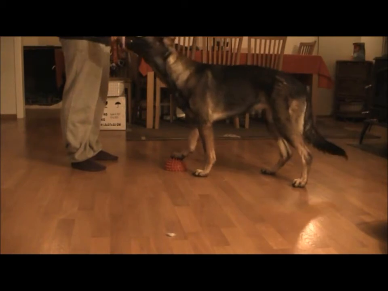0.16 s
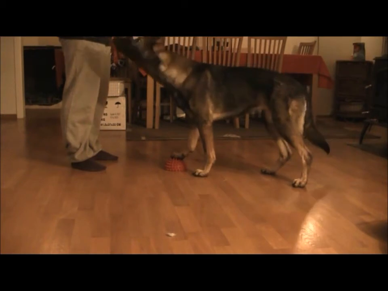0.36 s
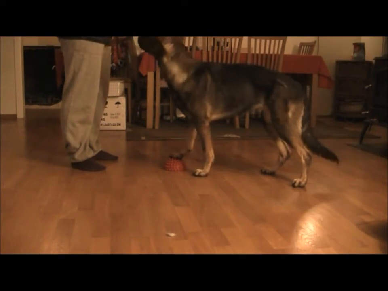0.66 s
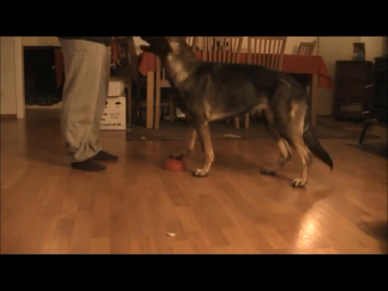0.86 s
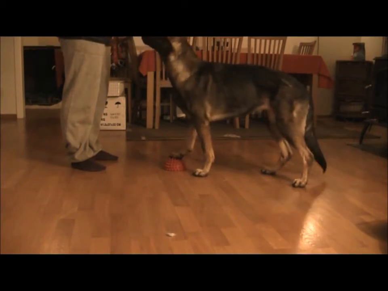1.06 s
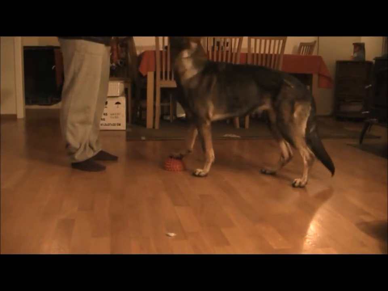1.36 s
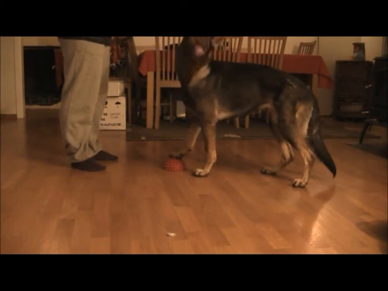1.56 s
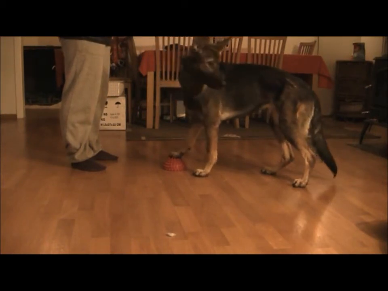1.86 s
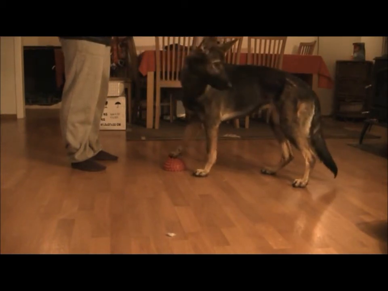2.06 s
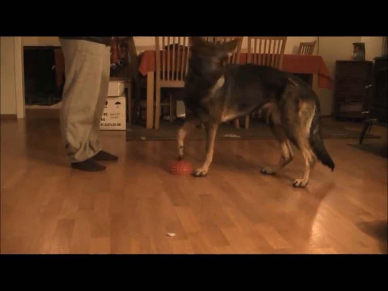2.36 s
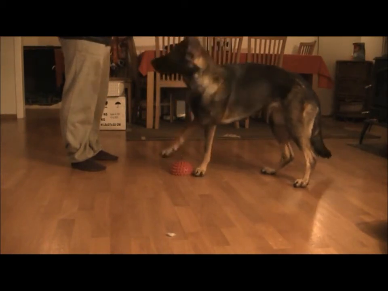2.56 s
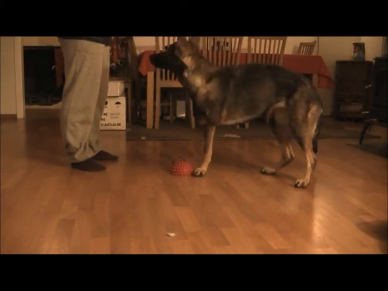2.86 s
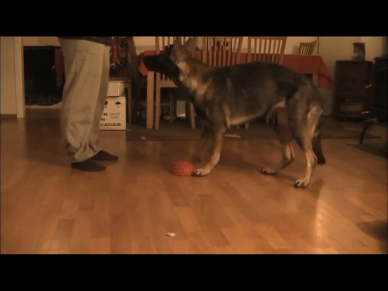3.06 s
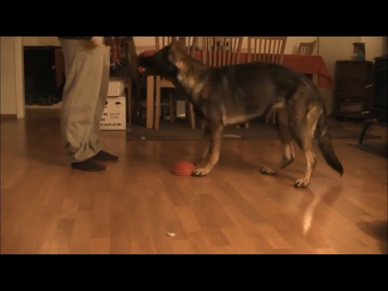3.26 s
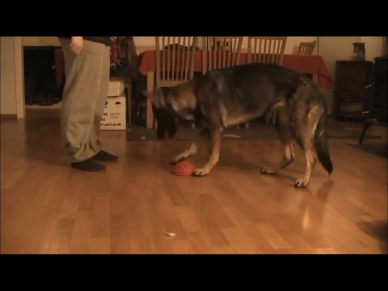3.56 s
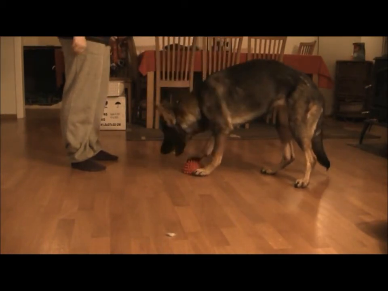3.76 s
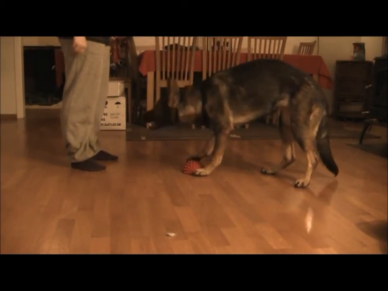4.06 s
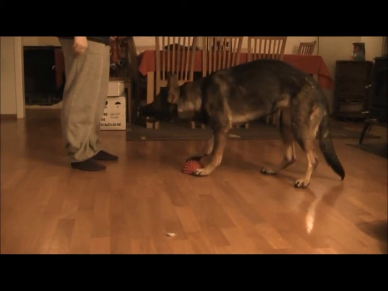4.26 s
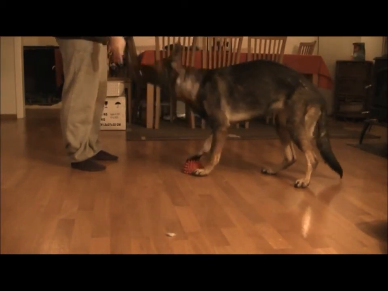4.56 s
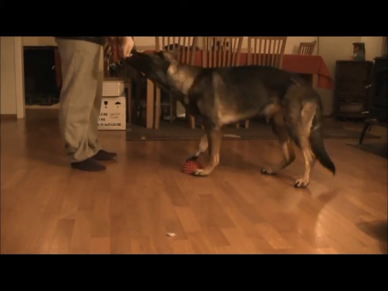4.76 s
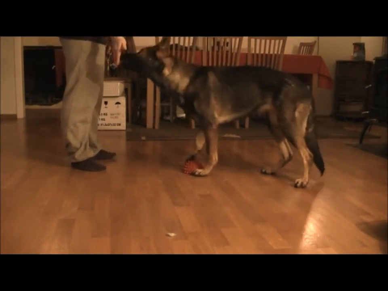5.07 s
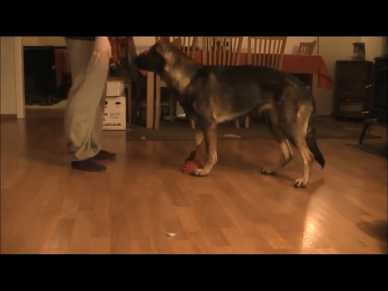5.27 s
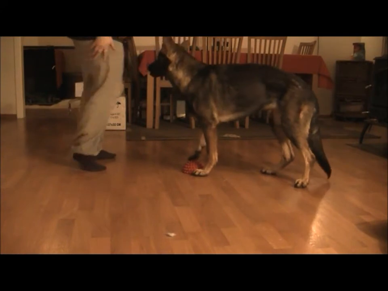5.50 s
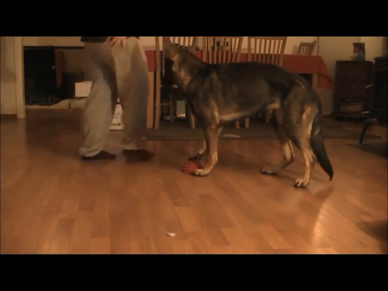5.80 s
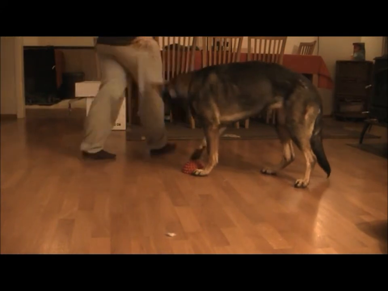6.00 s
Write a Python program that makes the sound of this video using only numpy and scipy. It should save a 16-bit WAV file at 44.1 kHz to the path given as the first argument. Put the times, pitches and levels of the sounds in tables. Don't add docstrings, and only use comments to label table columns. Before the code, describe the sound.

Faint stereo hiss, a slight hum and small focus-motor ticks underlie a dog stepping on wooden boards. Claws tap and ping, pads scuff, cloth and fur brush softly. After a run of small dry clicks and a low hollow wobble, one hard knock leaps far above everything, with a woody, rubbery ring and room tail. Quiet scuffs and crisp claw knocks continue to the end, a few metres from the microphone.

```python
import sys
import numpy as np
from scipy import signal
from scipy.fft import rfft, irfft
from scipy.io import wavfile

SR = 44100
rng = np.random.default_rng(int(sys.argv[2]) if len(sys.argv) > 2 else 0)


def store_wav(level_fs):
    pcm = np.round(np.clip(np.atleast_2d(level_fs), -1, 1) * 32767)
    wavfile.write(sys.argv[1], SR, pcm.T.astype(np.int16))


def level_to_linear(level):
    exponent = np.asarray(level, float) / 20
    return 10 ** exponent


N = 270628


def evened(x):
    return x / np.sqrt(np.mean(x ** 2) + 1e-20)


def peaked(x):
    return x / (abs(x).max() + 1e-20)


def read(points, hz):
    f, value = np.transpose(points)
    return np.interp(np.log(hz + 1), np.log(f + 1), value)


def colour(x, points):
    n = x.shape[-1]
    gain = level_to_linear(read(points, np.fft.rfftfreq(n, 1 / SR)))
    return irfft(rfft(x) * gain, n)


def causal(points):
    log_gain = np.log(level_to_linear(read(points, abs(np.fft.fftfreq(8192, 1 / SR)))))
    return np.fft.ifft(np.exp(log_gain - 1j * signal.hilbert(log_gain).imag)).real[:4096]


def add(mix, s, sound):
    part = mix[..., round(s * SR):][..., :sound.shape[-1]]
    part += sound[..., :part.shape[-1]]


def resonate(x, hz, width):
    turn = np.exp(2j * np.pi * np.cumsum(hz * np.ones(len(x))) / SR)
    r = np.exp(-np.pi * width / SR)
    return 2 * (turn * signal.lfilter([1 - r], [1, -r], x / turn)).real


def steep(x, hz, width):
    return resonate(resonate(x, hz, width), hz, width)


def modes(table, t):
    return peaked(sum(level_to_linear(db - 60 * t / t60) * np.sin(2 * np.pi * hz * t) for hz, db, t60 in table))


def touch(size, scratch, ms):
    contact = scratch * rng.standard_normal(size) * np.exp(-np.arange(size) / (ms * SR / 1000))
    contact[0] = 1
    contact_hz = 5000
    return signal.sosfilt(signal.butter(2, contact_hz, fs=SR, output="sos"), contact)


# f/Hz, t60/s
ROOM_T60 = [(100, 0.52), (300, 0.47), (700, 0.5), (1400, 0.51), (3000, 0.48), (5500, 0.38), (8000, 0.41),
            (14000, 0.09)]
# f/Hz, level/dB
ROOM_SIDE = [(60, -20), (180, -14), (550, -13.5), (1650, -7), (4970, -3.5), (15000, 9)]
# t/s, level/dB
ECHOES = [(.0015, 12.5), (.003, -15.5), (.008, 6), (0.0095, -2), (0.02, 2), (0.027, -20)]


def tail():
    hz, t, z = signal.stft(rng.standard_normal((2, SR)), SR, nperseg=256)
    z = z * level_to_linear(-60 * t / np.maximum(read(ROOM_T60, hz), .05)[:, None])
    z[1] *= level_to_linear(read(ROOM_SIDE, hz))[:, None]
    rise = np.minimum(np.arange(SR) / (0.0038 * SR), 1)
    mid, side = signal.istft(z, SR, nperseg=256)[1][:, :SR] * rise
    both = np.array([mid + side, mid - side]) / np.linalg.norm(mid)
    for s, db in ECHOES:
        both[:, round(s * SR) + rng.integers(-3, 4, size=2)] += 0.16 * level_to_linear(db) * rng.choice([-1, 1])
    return both


def in_room(x, wet_db):
    return x + level_to_linear(wet_db) * signal.fftconvolve(x[None], tail(), axes=1)[:, :len(x)]


# f/Hz, level/dB per Hz
HISS_MID = [(18, -44), (30, -13), (164, -8.5), (208, -7), (341, -11), (455, -8), (945, -12), (1230, -11),
            (1870, -13.5), (2490, -16.5), (15500, -37)]
# f/Hz, level/dB per Hz
HISS_SIDE = [(18, -45.5), (30, -46), (59, -8), (117, -7.5), (168, -6), (208, -6), (359, -7), (1170, -14),
             (1770, -17), (2020, -16.5), (15500, -41.5)]
# f/Hz, rms/dB
HUM = [(199.2, -87), (301.5, -80.5), (651.4, -84)]
# first t/s, steps
FOCUS = [(.419, 6), (.676, 3), (.899, 3), (1.036, 3), (1.219, 3), (1.396, 4), (1.579, 2), (1.676, 4),
         (1.939, 3), (2.476, 3), (2.659, 4), (2.836, 2), (3.196, 4), (3.379, 4), (3.556, 3), (4.676, 3),
         (4.899, 2), (4.996, 2), (5.179, 4), (5.356, 1), (5.539, 5), (5.756, 2), (5.899, 1)]
# f/Hz, width/Hz, peak/dB
LENS_BARREL = [(4500, 800, -59.5), (3300, 900, -63), (2200, 900, -64)]


def camera():
    mid = level_to_linear(-70.5) * evened(colour(rng.standard_normal(N), HISS_MID))
    side = level_to_linear(-64) * evened(colour(rng.standard_normal(N), HISS_SIDE))
    for hz, db in HUM:
        mid += level_to_linear(db) * evened(resonate(rng.standard_normal(N), hz, 3.5))
    steps = np.zeros(N)
    for s, count in FOCUS:
        steps[np.round((s + np.arange(count) / 25) * SR).astype(int)] = 1
    steps *= level_to_linear(2.5 * rng.standard_normal(N))
    for hz, width, db in LENS_BARREL:
        mid += level_to_linear(db) * peaked(steep(steps, hz, width))
    return np.array([mid + side, mid - side])


REST_DB, DRAG_REST_DB = -87, -77.5


def strokes(peak_s, length, db):
    rise_share = 0.49
    late = np.arange(0, N, 64)[:, None] / SR - peak_s
    reach = length * np.where(late < 0, rise_share, 1 - rise_share)
    power = (level_to_linear(db - 20 * (late / reach) ** 2) ** 2).sum(1) + level_to_linear(REST_DB) ** 2
    return np.interp(np.arange(N), np.arange(0, N, 64), np.sqrt(power))


# loudest t/s, length/s, level/dB, lower f/Hz, upper against lower/dB
SLIDES = [(0.017, 0.98, -74, 1010, 4.5), (0.222, 0.09, -66, 646, -4), (0.425, 0.57, -72.5, 860, 6.5),
          (0.796, .21, -90, 1190, 23), (1.478, 0.41, -72, 744, -17), (1.827, 0.27, -65.5, 920, 1),
          (2.215, 0.57, -70, 985, 9.5), (2.406, 0.14, -70, 880, 9.5), (2.598, 0.07, -59.5, 866, -1.5),
          (2.891, 0.15, -65, 1110, 1.5), (2.999, 0.12, -54, 746, -0.5), (3.364, 0.13, -59, 1170, -7.5),
          (3.588, 0.64, -63, 930, -4), (4.482, 0.33, -70, 810, -3), (4.593, 0.073, -61, 800, -1),
          (4.885, 0.058, -62, 860, 3), (5.08, 0.29, -65.5, 1223, 1.5), (5.412, 0.28, -63.5, 1210, -5),
          (5.76, 0.15, -75, 890, 9.5), (5.872, 0.17, -76, 900, 10.5), (6.004, 0.084, -64, 1160, 13.5)]
# loudest t/s, length/s, level/dB
BRUSHES = [(0.005, 0.55, -73), (0.357, 0.41, -65), (0.797, 0.16, -66.5), (1.351, 0.059, -69.5),
           (1.534, 0.22, -67.5), (2.2, 0.63, -67.5), (2.974, 0.69, -72), (3.532, 0.25, -70),
           (4.547, 0.34, -71), (4.842, 0.39, -64), (5.06, 0.14, -66.5), (5.47, 0.61, -72), (5.95, 1, -71)]
# f/Hz, level/dB per Hz
RUSTLE = [(1500, -7), (3000, -4.5), (5000, -7), (8000, -19.5), (12000, -26.5), (15500, -23)]


def scuffs():
    s, length, db, hz, upper_db = np.transpose(SLIDES)
    low_hz = np.interp(np.arange(N) / SR, s, hz)
    low_level = strokes(s, length, db)
    high_level = strokes(s, length, db + upper_db)
    slip_gain = level_to_linear(2.0 * np.minimum(rng.exponential(1, (3, N)), 4))
    slips = rng.standard_normal((3, N)) * slip_gain * (rng.random((3, N)) < .1)
    low = evened(steep(slips[0], low_hz, 410)) + 0.77 * evened(steep(slips[0], 800, 800))
    high = evened(steep(slips[0], 1700, 640)) + 2.5 * evened(steep(slips[0], 2050, 2086))
    drag_level = level_to_linear(DRAG_REST_DB) * (low_level / level_to_linear(REST_DB)) ** 0.45
    drag = evened(steep(slips[1], 270, 410)) * drag_level
    rustle = evened(colour(slips[2], RUSTLE)) * strokes(*np.transpose(BRUSHES))
    pads = level_to_linear(-5.0) * low_level * evened(low) + level_to_linear(-6.5) * high_level * evened(high)
    return in_room(pads + level_to_linear(-6.0) * drag + level_to_linear(-2.5) * rustle, -4.5)


# t/s, length/s, level/dB, f/Hz, width/Hz
SCRAPES = [(0.045, 0.35, -77.5, 2630, 290), (0.272, 0.063, -59.5, 750, 201),
           (0.277, 0.024, -56.5, 2000, 300), (0.452, 0.034, -69, 213, 85.5), (0.775, 0.03, -67, 530, 140),
           (1.538, 0.036, -75, 5800, 680), (1.653, 0.063, -63.5, 680, 500), (1.671, 0.048, -69, 2990, 287),
           (1.782, 0.082, -61, 800, 804), (2.001, 0.26, -70.5, 1480, 290), (2.719, 0.18, -71.5, 520, 294),
           (3.371, 0.057, -59, 1240, 800), (3.361, 0.082, -68.5, 2220, 450), (3.497, 0.11, -63, 1850, 600),
           (3.506, 0.11, -64.5, 900, 330), (4.057, 0.016, -61, 2680, 400), (4.112, 0.029, -73, 2560, 261),
           (4.538, 0.035, -56, 1020, 1120), (4.78, 0.1, -69.5, 1120, 190), (4.802, 0.15, -63.5, 2580, 850),
           (5.115, 0.068, -64.5, 557, 400.3), (5.154, 0.07, -72.5, 1260, 240), (5.16, 0.11, -73, 1920, 270),
           (5.41, 0.073, -68, 172, 75), (6.038, 0.044, -61, 463, 650), (0, 0.018, -60.5, 1044, 149),
           (.288, 0.028, -62.5, 5000, 500), (.335, .075, -65.5, 950, 600), (0.774, 0.022, -57, 1240, 200),
           (2.37, 0.057, -63.5, 735, 250), (3.236, 0.066, -66.5, 850, 149), (5.392, 0.014, -58, 1180, 350),
           (5.396, 0.036, -51, 1520, 450), (5.69, .025, -73, 4500, 600), (5.862, .05, -65.5, 1590, 500),
           (5.391, 0.02, -63, 3980, 450), (5.391, .018, -68, 5100, 400), (5.399, .025, -66, 3300, 900),
           (0.766, 0.027, -68, 4140, 450), (3.114, .026, -64.5, 3400, 300),
           (3.152, 0.032, -68.5, 1700, 798.7), (3.251, 0.013, -62, 2070, 900),
           (3.275, 0.013, -55, 1900, 700), (5.668, 0.091, -68.5, 75.4, 45)]
# t/s, length/s, level/dB, f/Hz, width/Hz
GRIT = [(0, 0.037, -74.5, 8200, 5000), (.278, 0.05, -76.5, 11000, 6000), (1.293, .04, -80, 7200, 2500),
        (2.966, 0.035, -75, 11000, 6000), (4.84, .07, -76, 7400, 5000), (5.386, 0.051, -80, 10500, 6000),
        (5.966, 0.0075, -61, 7470, 5000), (5.973, 0.048, -65, 6000, 4500)]


def scrapes():
    out = np.zeros(N)
    for s, length, db, hz, width in SCRAPES + GRIT:
        u = np.linspace(0, 1, round(length * SR))
        slips = rng.standard_normal(len(u)) * level_to_linear(2.26 * rng.exponential(1, len(u)))
        swell = np.sin(np.pi * u ** 0.46) ** 0.66
        add(out, s, level_to_linear(db) * evened(steep(slips, hz, width)) * swell)
    return in_room(out, -6.0)


# t/s, level/dB, f/Hz
ROCKING = [
    [(2.84, -81, 180), (2.856, -57, 165.5), (2.876, -75, 169), (2.956, -62, 186), (2.986, -52.5, 150),
     (3.028, -55.5, 148), (3.06, -71, 154)],
    [(4.47, -75, 185), (4.488, -70, 178.5), (4.584, -57.5, 235), (4.622, -61, 253.6), (4.672, -74.5, 248),
     (4.71, -67, 212), (4.742, -88, 268), (4.76, -100, 281)],
]


def rocking():
    out = np.zeros(N)
    for rows in ROCKING:
        s, level_db, hz = np.transpose(rows)
        t = np.arange(s[0], s[-1], 1 / SR)
        glide_hz = np.interp(t, s, hz)
        steady = 3 * np.cos(2 * np.pi * np.cumsum(glide_hz) / SR)
        uneven = evened(resonate(rng.standard_normal(len(t)), glide_hz, 25))
        level = level_to_linear(np.interp(t, s, level_db)) * signal.windows.tukey(len(t), .2)
        add(out, s[0], level * evened(steady + uneven))
    return in_room(out, -17.0)


# f/Hz, level/dB per Hz
CRACK = [(35, -35), (85, -11.5), (120, -14), (170, -4), (380, -9), (679, -6), (1050, -12.5), (1270, -12),
         (1560, -11.5), (3300, -13.5), (3930, -22), (5550, -28), (9230, -44), (15000, -57.5)]
# f/Hz, level/dB, t60/s
TOY = [(177.2, -0.5, 0.34), (213, -7.5, 0.27), (264.5, 0.5, 0.26), (346, -20.5, .15), (467, -6, 0.16),
       (581, -1, 0.24), (606, -5.5, 0.38), (680, -4, 0.31), (741, -16, 0.54), (860, -9.5, 0.18),
       (1010, -3.5, 0.11), (1138, -8.5, .15), (1190, -7.5, 0.12), (1260, -10, .1)]
# f/Hz, level/dB, t60/s
SLAP = [(1480, 11, 0.053), (2470, -21, 0.018), (3370, -17, 0.0029)]


def knock():
    knock_s, knock_db, room_db = 3.7008, -15.5, 4
    skid_s, skid_db, skid_hz = .017, -37, 1630
    t = np.arange(40000) / SR
    hz = np.fft.rfftfreq(len(t), 1 / SR)
    bending = np.exp(-2j * np.pi * .08 * (2 * np.sqrt(hz) - hz / np.sqrt(SR / 2)))
    crack = peaked(irfft(rfft(causal(CRACK), len(t)) * bending, len(t)))
    ring = modes(TOY, t) * np.minimum(t / 0.0024, 1)
    slap = modes(SLAP, t) * np.minimum(t / 0.0029, 1)
    roomy = in_room(0.5 * crack + 0.037 * ring, room_db)
    out = np.zeros((2, N))
    add(out, knock_s, level_to_linear(knock_db) * (roomy + 0.76 * ring + 0.4 * slap))
    rise = np.arange(round(skid_s * SR)) / (skid_s * SR)
    skid = evened(steep(rng.standard_normal(len(rise)), skid_hz, 770)) * rise ** 0.55
    add(out, knock_s - skid_s, level_to_linear(skid_db) * skid)
    return out


# top t/s, peak/dB, f/Hz, length/ms
PIPS = [(.2875, -50, 2060, 6.1), (.293, -47.5, 740, 20), (0.308, -50, 7600, 0.4), (.42, -60, 8000, .4),
        (.453, -62, 7000, .8), (0.495, -59, 11600, .6), (0.46, -59, 4300, 3.3), (1.235, -67, 4400, 8.9),
        (1.7, -64, 10000, .5), (1.77, -58, 10200, .5), (2.4, -52, 1280, 1.1), (2.9767, -45, 2800, 2.6),
        (2.982, -39.5, 1120, 1.7), (2.987, -45, 276, 6.3), (1.507, -56, 1900, 3.5), (3.647, -49.5, 220, 9),
        (1.679, -47, 780, 1.5), (4.551, -53, 5300, 1.5), (4.63, -61, 4100, 8), (5.9885, -48, 2600, 1),
        (.771, -49, 1700, 1), (.7678, -55.5, 3500, 1), (4.4, -48, 4600, .6), (5.3955, -38.5, 1220, 4),
        (5.4, -42, 1620, 5), (5.396, -50, 2500, 13), (5.395, -55, 4000, 5), (5.404, -59, 4800, 5),
        (0.73, -58, 2500, 4.6), (0.77, -59, 2100, 6), (0.82, -66, 4320, 6), (3.2335, -50, 1600, 1),
        (4.101, -44.5, 3000, 0.67), (4.1016, -52, 4700, 0.95), (4.5, -39.5, 1550, 1.16),
        (4.548, -36, 2700, 0.48), (4.606, -63, 12500, .7), (4.665, -66, 12000, .6), (4.876, -57, 12000, .4),
        (5.249, -68, 10000, .5), (5.92, -33.5, 1640, 1.56), (5.98, -37.5, 2100, 1.3),
        (5.981, -40, 5100, 0.71), (5.9995, -52, 2000, 1.55), (6.04, -53, 1740, 8), (6.047, -57, 580, 5.6),
        (6.065, -62, 437, 8), (2.5, -47.5, 1300, 1.5), (4.439, -65, 1450, 1.6), (3.252, -39.5, 1800, 2.2)]
# top t/s, peak/dB, f/Hz, length/ms
CHATTER = [(3.701, -18.5, 2000, 1.8), (3.7025, -18, 900, 2), (3.7033, -17, 1420, 2), (3.7062, -23, 1500, 2),
           (3.701, -35, 1582, 14.5), (3.7016, -25, 2940, 1.2), (3.709, -36, 5000, 2), (3.72, -27, 560, 4),
           (3.7255, -28, 480, 4), (3.75, -30, 520, 5), (3.76, -31, 700, 4), (3.772, -31, 720, 4),
           (3.794, -33, 760, 4)]


def pips():
    out = np.zeros(N)
    t = np.arange(-600, 600) / SR
    for s, db, hz, ms in PIPS + CHATTER:
        bell = np.exp(-(2000 * t / ms) ** 2)
        add(out, s + t[0], level_to_linear(db) * np.cos(2 * np.pi * hz * t) * bell)
    return in_room(out, -16.0)


# t/s, peak/dB, pitch ratio to the plank's own, top modes/dB
BLOWS = [(0.7689, -42, 1.02, -3.5), (3.2338, -46, 1.01, -10), (4.1004, -72, 0.93, 13),
         (5.393, -38, 0.992, -3.5), (5.9795, -44, 0.89, 4)]
# f/Hz, width/Hz, level/dB
PLANK_LOW = [(880, 180, -12), (1185, 260, -3), (1570, 340, 0.5), (2400, 260, -8)]
# f/Hz, width/Hz, level/dB
PLANK_TOP = [(3210, 190, -7.5), (3890, 350, -7), (5130, 230, -21)]


def plank_part(contact, table, ratio):
    return sum(level_to_linear(db) * peaked(steep(contact, hz * ratio, width)) for hz, width, db in table)


def planks():
    out = np.zeros((2, N))
    for s, db, ratio, top_db in BLOWS:
        contact = touch(size=12000, scratch=.06, ms=4)
        low = plank_part(contact, PLANK_LOW, ratio)
        top = plank_part(contact, PLANK_TOP, ratio)
        add(out, s, level_to_linear(db) * in_room(peaked(low + level_to_linear(top_db) * top), -1.5))
    return out


# t/s, peak/dB, f/Hz, left against right/dB
TIPS = [(0.631, -50.5, 2480, 6), (0.954, -52, 2470, 7), (1.1256, -51, 3470, 4), (1.2309, -63.5, 4580, 4),
        (1.5594, -75, 2560, -12), (2.5575, -51, 5250, 6), (3.121, -59, 3370, 6), (4.055, -54, 3090, 10),
        (4.356, -56.5, 5240, 4)]
# t/s, level/dB
FLUTTER = [(.034, -9), (.082, -16)]


def tips():
    out = np.zeros((2, N))
    for s, db, hz, pan_db in TIPS:
        contact = touch(size=12000, scratch=.08, ms=5)
        narrow = peaked(steep(contact, hz, .085 * hz))
        broad = peaked(steep(contact, 1.08 * hz, 900))
        tip = peaked(narrow + level_to_linear(-17) * broad)
        tip = tip * np.minimum(np.arange(len(tip)) / (.003 * SR), 1)
        tip = tip + sum(level_to_linear(echo_db) * np.roll(tip, round(echo_s * SR)) for echo_s, echo_db in FLUTTER)
        pan = level_to_linear([[pan_db / 2], [-pan_db / 2]])
        add(out, s, level_to_linear(db) * pan * in_room(tip, -6.5))
    return out


# f/Hz, width/Hz, level/dB
CLAW = [(2240, 170, 14), (3170, 490, 9), (4150, 1900, 3.5), (4540, 230, -15), (5100, 5560, 5.5),
        (9700, 4400, -44.5)]


def tap(db, hz, thud_db, thud_hz, tick_db):
    contact = touch(size=4000, scratch=.035, ms=3)
    pitched = steep(steep(contact, hz, 0.45 * hz), hz, 1.55 * hz)
    fixed = steep(steep(contact, 1780, 2380), 1520, 2240)
    board = peaked(pitched + 0.49 * fixed)
    thud = peaked(steep(contact, thud_hz, 0.33 * thud_hz) + 0.4 * steep(contact, 420, 410))
    tick = peaked(sum(level_to_linear(claw_db) * steep(contact, claw_hz, width) for claw_hz, width, claw_db in CLAW))
    return level_to_linear(db) * (board + level_to_linear(thud_db - 1.5) * thud + level_to_linear(tick_db + 15.0) * tick)


# t/s, peak/dB, board f/Hz, tick against board/dB
CLAW_TAPS = [(0.001, -52, 1000, -12), (0.264, -64, 784, -4), (0.284, -53, 730, -1), (0.339, -52, 1120, -22),
             (0.496, -53.5, 596, -17), (0.769, -45, 2300, -14.5), (1.498, -60, 1930, -10),
             (2.907, -52, 1430, -17), (3.233, -40, 1356, -29.5), (3.249, -48, 1875, -27),
             (3.279, -80.5, 1847, 8.5), (4.539, -40, 2080, -25), (5.164, -53.5, 1780, -15),
             (5.389, -54.5, 1480, -9), (5.394, -47, 1490, -12), (5.968, -60, 2220, 0)]
# t/s, peak/dB, board f/Hz, thud f/Hz, tick against board/dB
PAW_TAPS = [(1.661, -59.5, 587, 550, -12), (1.678, -59.5, 860, 633, -8), (1.784, -56, 730, 383, -21),
            (1.794, -53.5, 830, 390, -27), (1.822, -50, 1200, 377, -16), (2.375, -49, 1340, 278, -17),
            (2.582, -54, 1350, 340, -25), (2.97, -42, 1290, 195, -15.5), (2.978, -43, 1190, 248, -7.5),
            (3.503, -58.5, 1820, 626, -8), (4.5486, -44.5, 1650, 220, -6.5), (4.604, -57, 1690, 258, -8.5),
            (5.697, -57, 1490, 290, -16), (5.777, -54.5, 1040, 210, -18), (5.862, -57, 1500, 217, -28),
            (6.039, -50, 1420, 462.2, -11.5)]
# t/s, peak/dB, board f/Hz, tick against board/dB
CLICKS = [(1.333, -46.5, 1470, -20), (1.9626, -47.5, 1500, -35), (2.065, -45, 1603, -24),
          (2.107, -52, 1420, -28), (2.189, -43, 1480, -23), (2.242, -46.5, 1560, -20),
          (2.313, -46, 1450, -28), (3.6122, -49, 1700, -27), (3.644, -45, 1100, -24),
          (4.0985, -59.5, 3300, -8), (4.439, -51.5, 1470, -25), (4.498, -47.5, 696, -30),
          (4.769, -64, 1080, 3.5), (5.032, -52, 3170, -18), (5.9734, -41, 2200, -17)]


def paws():
    claw_thud_db, paw_thud_db, click_thud_db = -40, -2.5, -18.5
    light_thud_hz = 240
    places, near = np.zeros((4, N)), np.zeros(N)
    taps = [(s, db, hz, claw_thud_db, light_thud_hz, tick_db) for s, db, hz, tick_db in CLAW_TAPS]
    taps += [(s, db, hz, paw_thud_db, thud_hz, tick_db) for s, db, hz, thud_hz, tick_db in PAW_TAPS]
    for k, (s, *row) in enumerate(sorted(taps)):
        add(places[k % len(places)], s, tap(*row))
    for s, db, hz, tick_db in CLICKS:
        add(near, s, tap(db, hz, click_thud_db, light_thud_hz, tick_db))
    return sum(in_room(p, 2.5) for p in places) + in_room(near, -9)


def scene():
    sources = scuffs() + scrapes() + rocking() + knock() + planks() + tips() + paws()
    sources = sources * level_to_linear([[.4], [-.4]])
    band = signal.butter(3, [105, 15000], "bandpass", fs=SR, output="sos")
    return signal.sosfilt(band, sources) + camera() + pips()


def band_limit(x):
    return signal.sosfilt(signal.butter(12, 15440, fs=SR, output="sos"), x)


def record(dry):
    return band_limit(dry)


dry = scene()
out = record(dry)
store_wav(out)
```